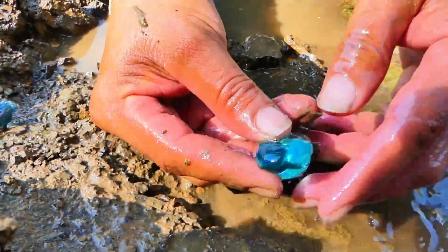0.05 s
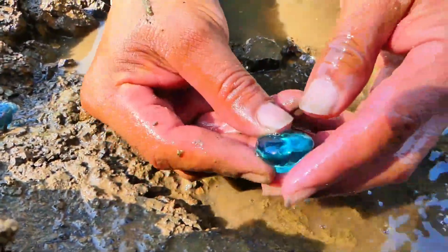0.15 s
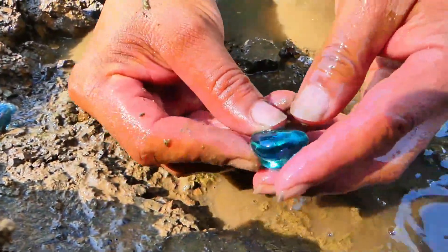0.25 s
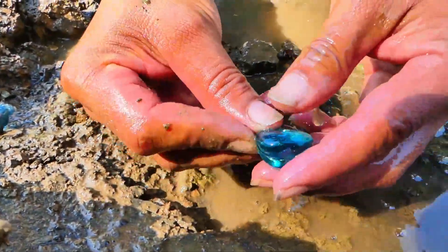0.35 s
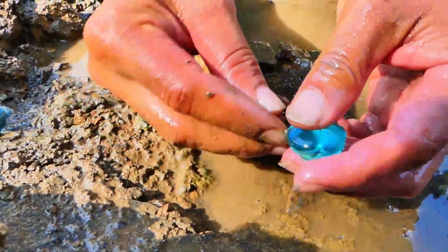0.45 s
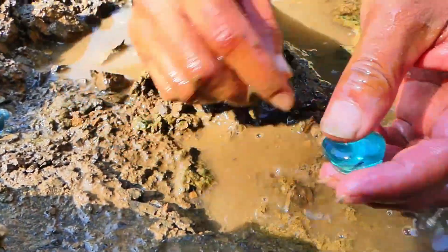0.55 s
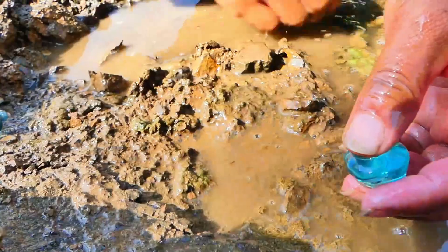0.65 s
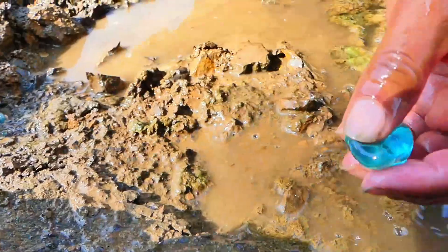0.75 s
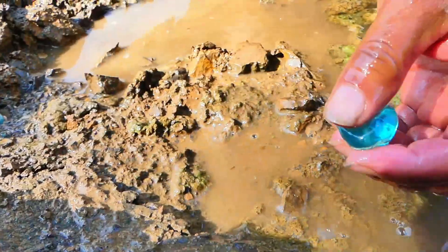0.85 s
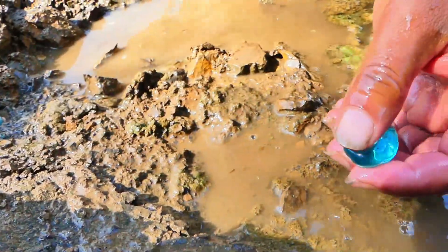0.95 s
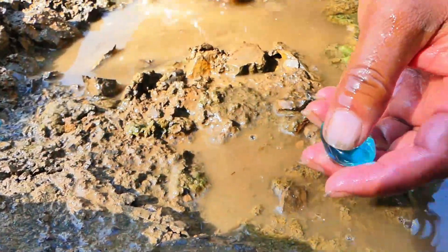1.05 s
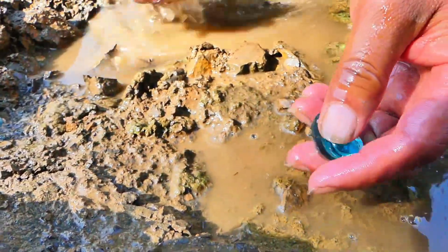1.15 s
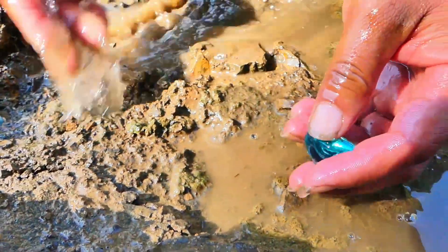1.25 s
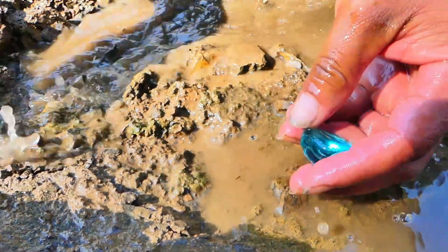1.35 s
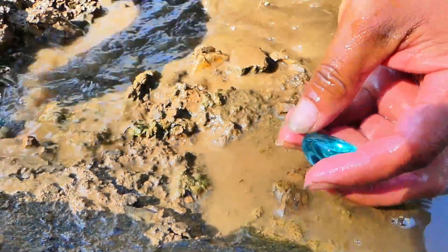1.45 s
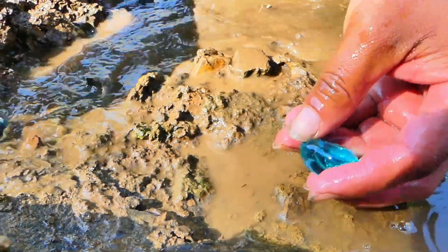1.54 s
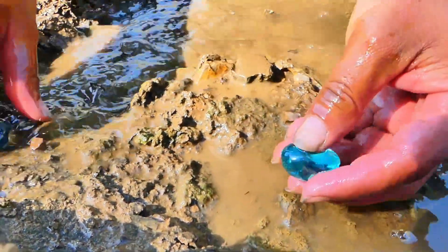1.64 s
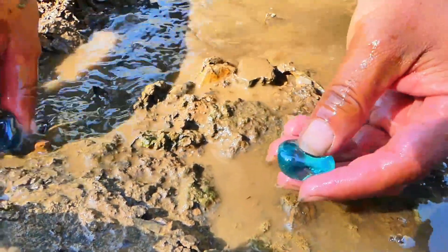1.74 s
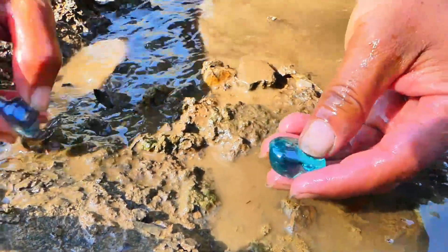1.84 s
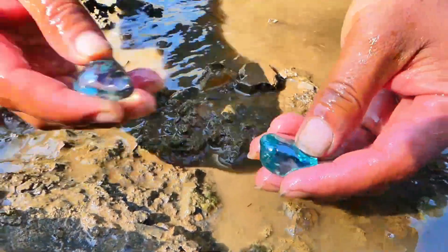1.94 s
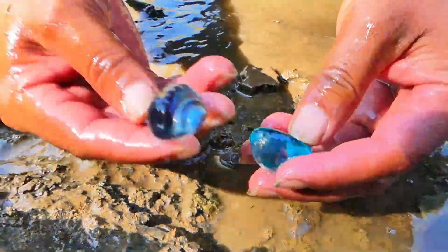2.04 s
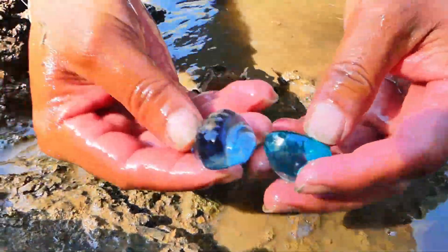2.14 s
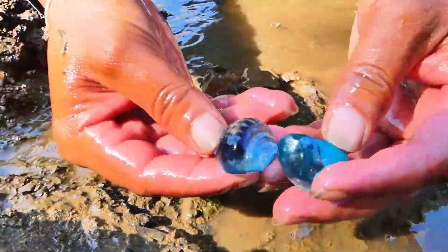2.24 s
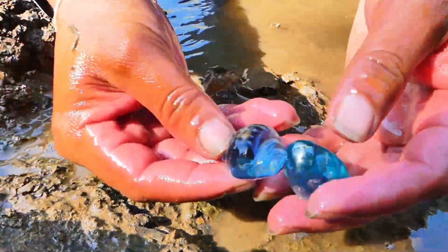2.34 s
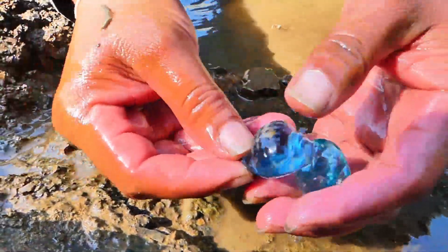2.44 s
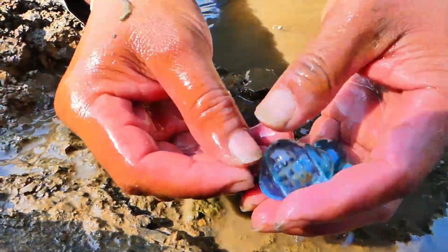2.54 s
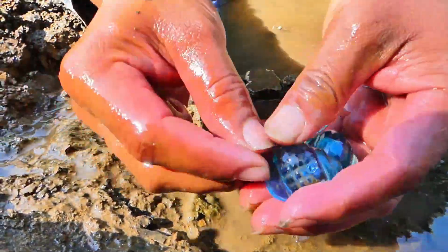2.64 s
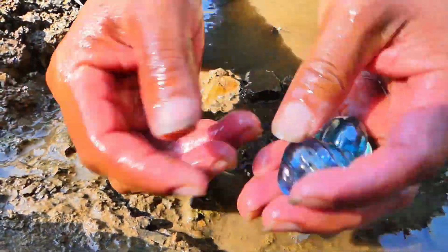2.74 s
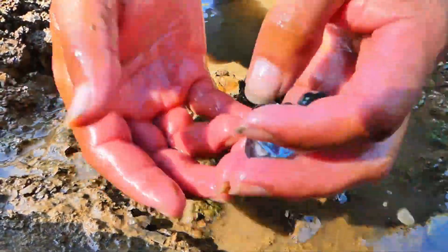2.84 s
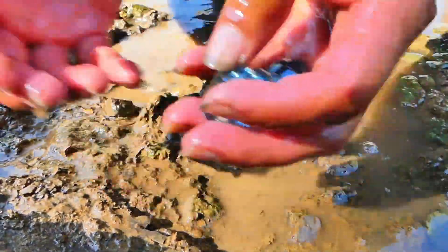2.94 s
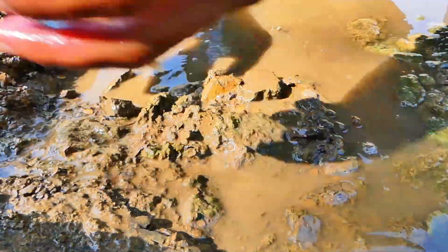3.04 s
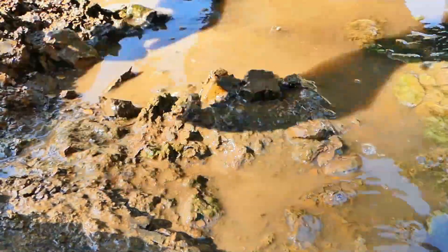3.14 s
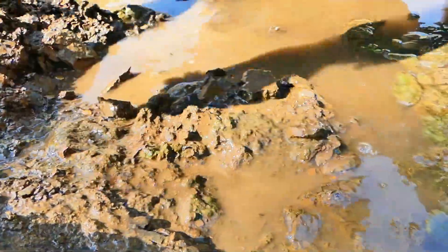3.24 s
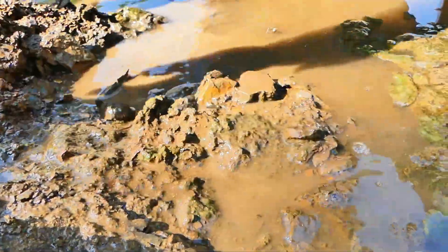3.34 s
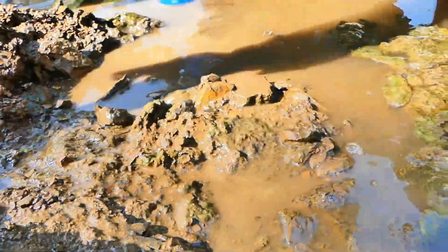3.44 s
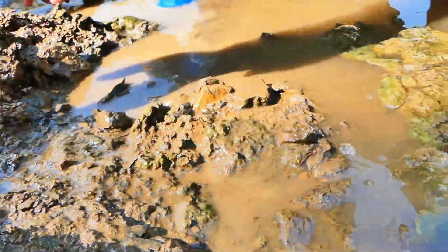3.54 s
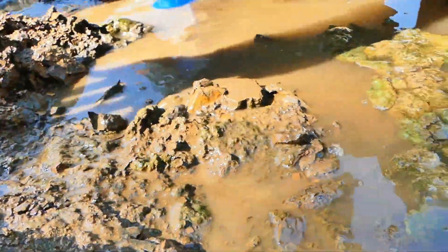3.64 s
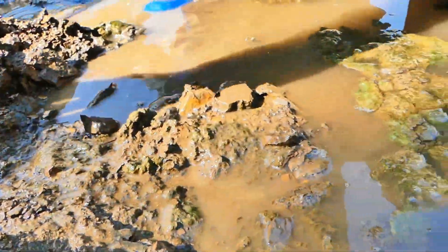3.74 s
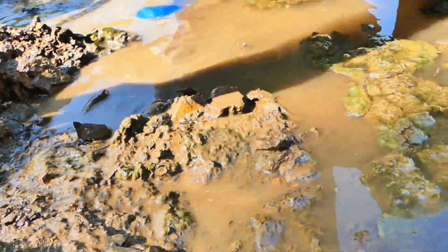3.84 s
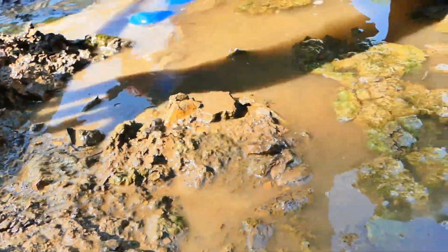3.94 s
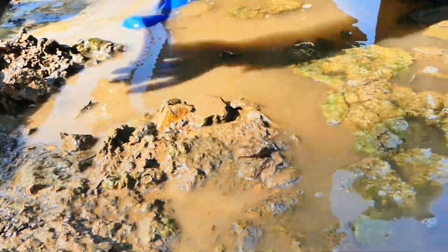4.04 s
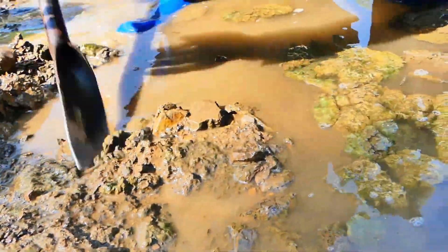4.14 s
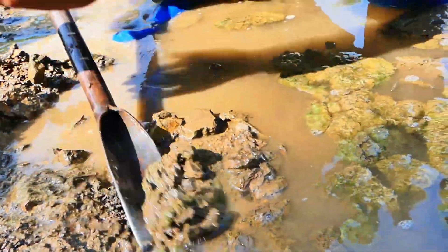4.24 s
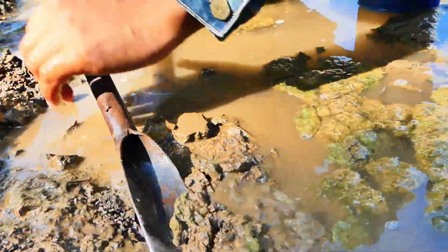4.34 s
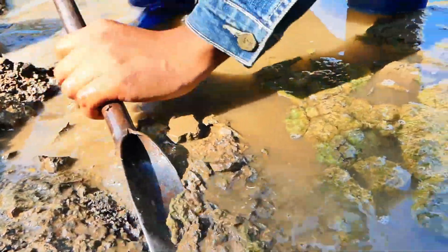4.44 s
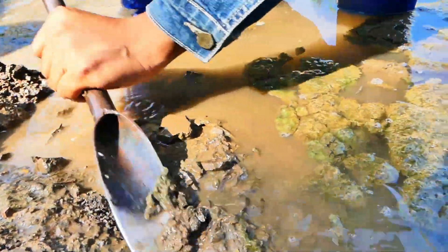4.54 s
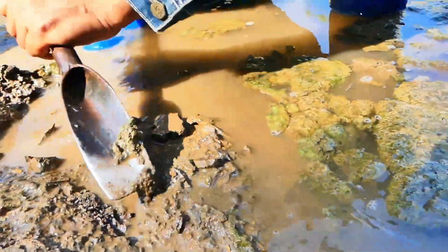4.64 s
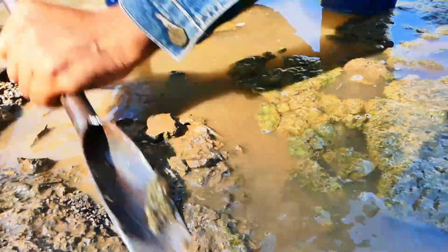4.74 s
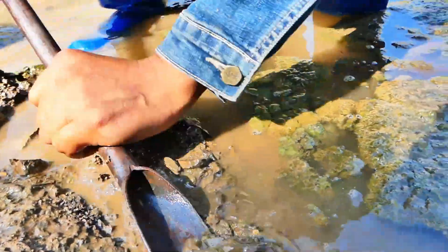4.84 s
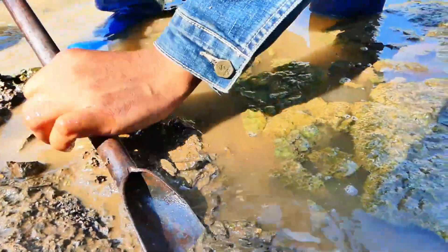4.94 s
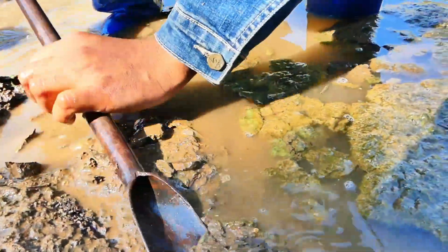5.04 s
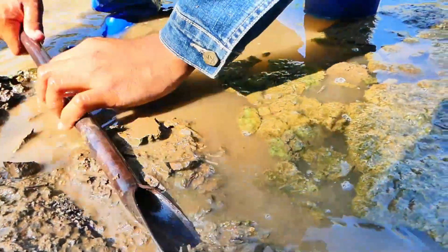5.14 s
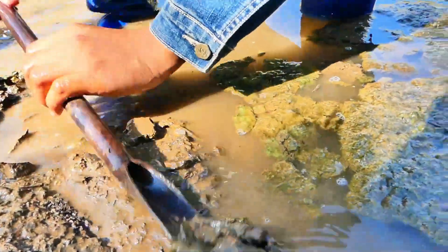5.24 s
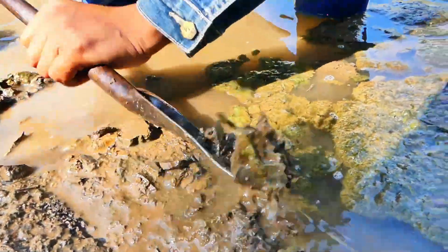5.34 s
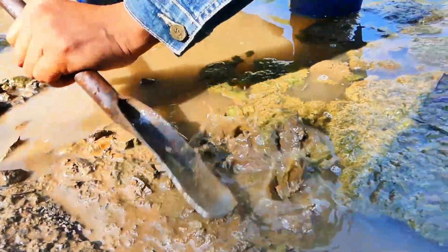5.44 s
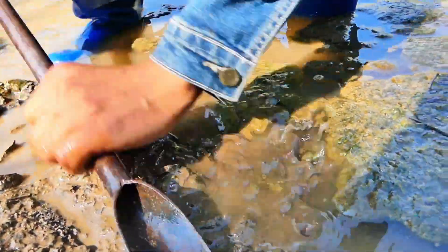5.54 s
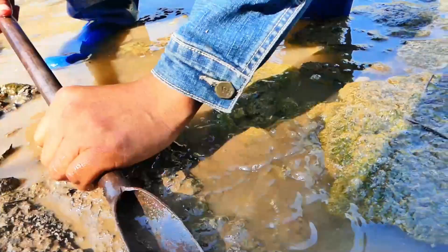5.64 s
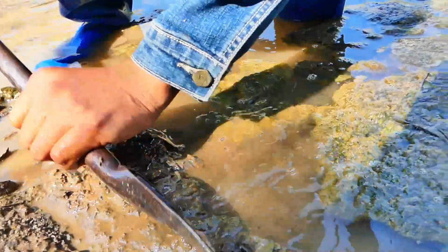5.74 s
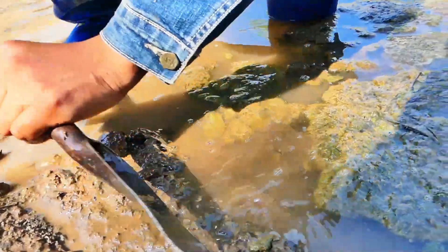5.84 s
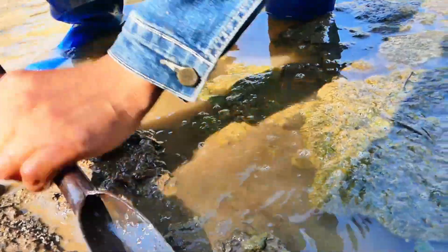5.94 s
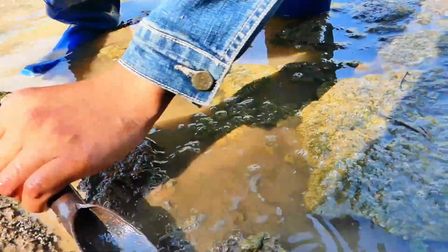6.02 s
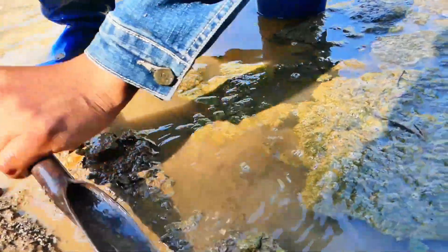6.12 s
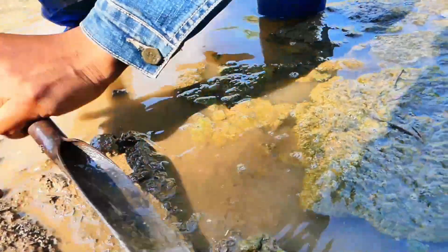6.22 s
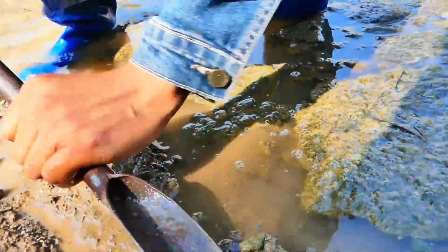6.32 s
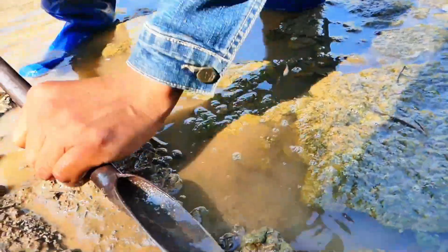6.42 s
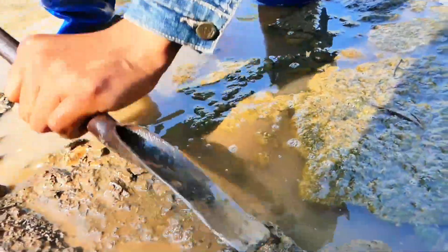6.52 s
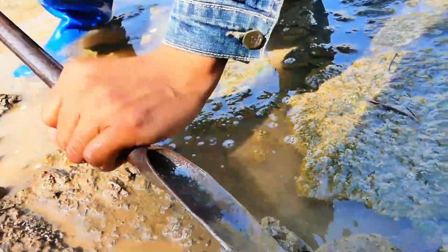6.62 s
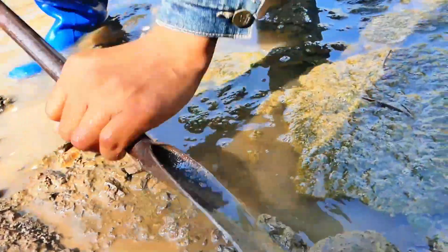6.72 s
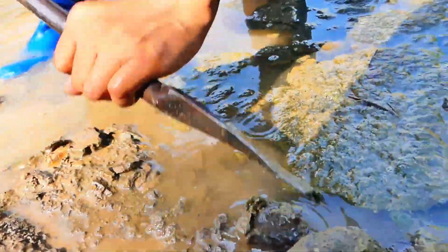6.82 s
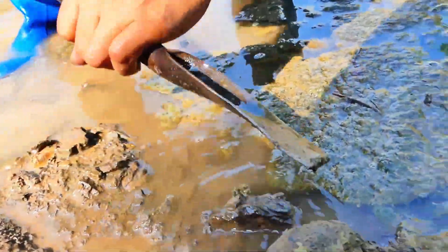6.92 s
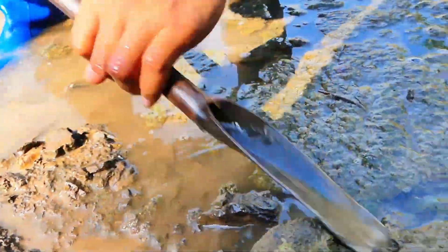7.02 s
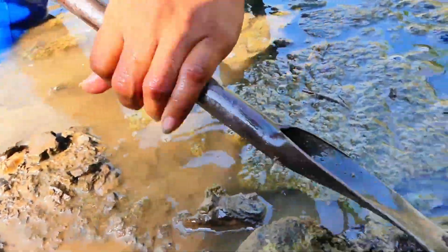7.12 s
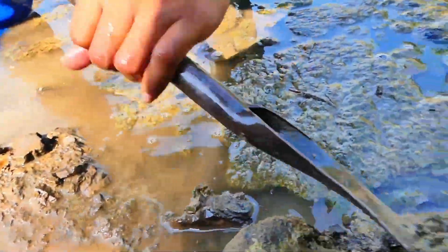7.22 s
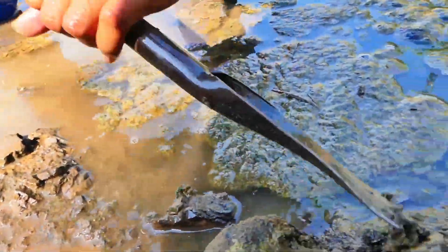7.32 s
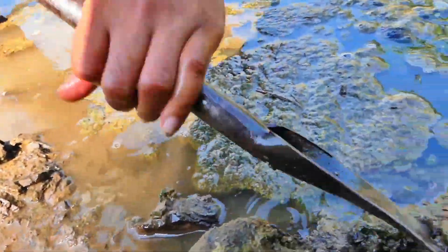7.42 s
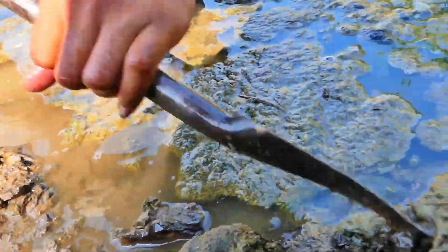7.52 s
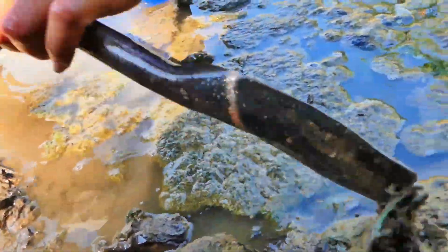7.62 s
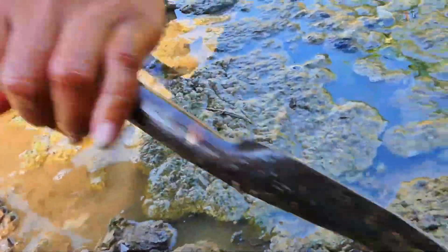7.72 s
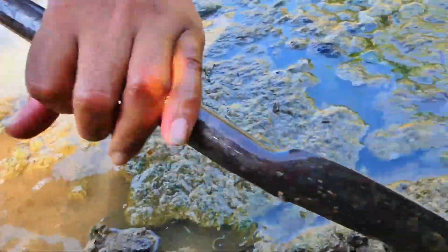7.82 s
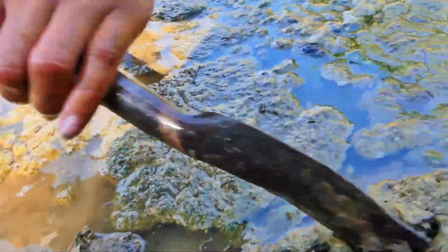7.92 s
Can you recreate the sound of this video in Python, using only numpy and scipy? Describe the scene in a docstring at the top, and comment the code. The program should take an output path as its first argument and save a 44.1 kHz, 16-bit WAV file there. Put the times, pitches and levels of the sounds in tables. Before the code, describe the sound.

A close stereo microphone beside a muddy puddle picks up faint handling, a lively rinse of splashes, gurgles and wet clicks, then near quiet. Metal then bites into wet grit: irregular scrapes, dull mud thuds, clanks on stone and popping mud bubbles. A sleeve rustles late on. The digging sits slightly left, with a light outdoor breeze and little reverberation.

```python
"""In quiet open air, close to a shallow puddle, wet fingers rub glass pebbles: skin sticks and slips,
bubbles ring, spray washes and small wet contacts click through damped resonances.
Then a steel scoop digs in gritty mud: fracturing grit and blows on stones drive its modes and shake the
mud, while sloshing water and collapsing mud pockets ring as air bubbles. A cloth sleeve swishes."""
import sys
import numpy as np
from scipy import signal
from scipy.fft import rfft, irfft, next_fast_len
from scipy.io import wavfile
from scipy.ndimage import map_coordinates

SR = 44100
rng = np.random.default_rng(int(sys.argv[2]) if len(sys.argv) > 2 else 0)


def dump(signal):
    """Clip the signal to [-1, 1] and save it as 16-bit WAV at the path in sys.argv[1]."""
    limited = np.clip(np.atleast_2d(signal).T, -1, 1)
    pcm = np.round(limited * 32767).astype(np.int16)
    wavfile.write(sys.argv[1], SR, pcm)


N = 351477
TIME = np.arange(N) / SR  # seconds
AGE = np.arange(SR // 4) / SR  # seconds inside one event

# spectrum of the outdoor hush: frequency_hz, relative_db_per_hz
HUSH_SPECTRUM = [(15, -51), (25, -17.5), (96, -1.5), (129, -3.5), (297, -4), (331, -7.5), (378, -10.5),
                 (433, -7.5), (537, -13), (1050, -11.5), (1530, -19.5), (5430, -20.5), (15500, -25.5)]
HUSH_DB = -63
# breeze and distant surroundings: time_s, level_db
BREEZE = [(0, -72.5), (3.1, -75), (3.6, -61), (4.5, -63), (5.0, -66), (5.9, -68), (6.4, -57.5), (6.75, -56),
          (7.3, -59.5), (7.97, -63)]
# stereo lean of the work before drift: frequency_hz, left_minus_right_db
LEFT_LEAN = [(60, -16), (300, 5.5), (700, 6.5), (1500, 4.5), (4500, 1.5), (10000, -1)]
# the lean grows, then shrinks towards the centre: time_s, share_of_lean
DRIFT = [(1, 0.74), (3.8, 1.34), (7.97, .25)]
TOP_HZ = 15900  # band limit

# cloth swishes: centre_s, half_length_s, level_db, centre_hz
SWISHES = [(3.353, 0.077, -59, 1800), (6.185, 0.043, -56, 1040), (6.5, 0.1, -61, 1110),
           (6.996, 0.058, -49.5, 1120)]

# soft bumps of the hands: start_s, level_db
BUMPS = [(0.372, -36.5), (0.544, -34.5), (1.989, -37.5), (2.064, -40), (2.107, -44), (3.402, -39.5)]
BUMP_HZ, BUMP_T60_S = 109, 0.049
JUDDER_S, JUDDER_WIDTH_S, JUDDER_DB = 2.568, 0.019, -40  # middle, Gaussian width, drive level
JUDDER_HZ, JUDDER_OCTAVES_PER_S = 134, -11.5  # pitch at the middle, glide
SQUEAK_S, SQUEAK_LENGTH_S, SQUEAK_DB = 2.622, 0.024, -33  # start, length, peak of each slip
SLIPS_PER_S, SLIP_DOUBLING_S = 125, 0.014  # initial rate, time in which it doubles

# wet clicks of drops, pebbles and small stones: start_s, peak_db, centre_hz
CLICKS = [(0.288, -40, 10300), (.358, -40, 3550), (1.01, -22, 3220), (1.18, -25.5, 3470),
          (1.263, -27.5, 4000), (1.296, -26, 4750), (1.304, -28, 3970), (1.334, -20, 5370),
          (1.37, -26, 4200), (1.397, -32, 2220), (2.152, -34, 1750), (2.286, -35.5, 1830),
          (2.295, -29.5, 1850), (2.585, -37.5, 2170), (2.607, -27.5, 5740), (3.499, -29.5, 2400),
          (3.539, -34, 2560), (3.55, -17, 5860), (4.028, -39, 4360), (4.294, -16, 2000), (4.426, -37, 4960),
          (4.953, -42.5, 1750), (5.242, -32.5, 1550), (5.282, -37, 2360), (5.48, -27.5, 3320),
          (6.416, -33.5, 5200)]
CLICK_T60_S = 0.018  # of the exciting burst

# hand or scoop sloshes the water: start_s, hold_s, level_db
SLOSHES = [(0.685, .025, -57), (.923, .05, -52), (0.981, .085, -38), (1.201, .015, -44),
           (1.273, .035, -41.5), (1.352, .075, -40.5), (4.342, .04, -47.5), (5.32, .07, -54),
           (5.488, .03, -44)]
SLOSH_RISE_S, SLOSH_T60_S = .012, .19
# stirring of the water between the sloshes: time_s, level_db
TRICKLE = [(0, -82), (.66, -92), (.87, -58), (1.17, -52), (1.52, -56.5), (1.75, -57.5), (1.97, -73),
           (2.7, -74), (2.95, -62), (3.7, -68), (4.65, -56.5), (5.05, -64), (5.3, -59), (6.1, -59),
           (6.35, -67), (7.97, -64)]
CALM_DB = -57  # below this stirring level the water only fizzes evenly
# spectrum of the spray: frequency_hz, relative_db_per_hz
SPRAY_SPECTRUM = [(180, -18.5), (300, -17.5), (652, -16), (985, -28), (1110, -27), (1970, -9.5),
                  (2250, -15.5), (2650, -13), (5850, -15.5), (15500, -25.5)]
SPURT_DB, SPURTS_PER_S = 3, 55  # largest spread and rate of the uneven spurts
# large air bubbles in the water: start_s, level_db, initial_pitch_hz
BUBBLES = [(.938, -35, 3560), (.958, -29, 4800), (.966, -26, 3140), (0.984, -32.5, 795),
           (.989, -20.5, 4740), (1.04, -31, 853), (1.053, -28.5, 1106), (1.104, -31.5, 1630),
           (1.125, -34.5, 2220), (1.179, -22.5, 4740), (1.179, -28.5, 2020), (1.216, -33.5, 1270),
           (1.262, -19.5, 1237), (1.281, -30.5, 1790), (1.297, -23.5, 2490), (1.397, -22, 2210),
           (1.485, -33, 3320), (2.242, -51, 1320), (3.734, -42, 1640), (4.19, -38, 4240), (4.338, -29, 944),
           (4.365, -30, 1335), (4.614, -31, 1536), (5.446, -33, 4470), (5.479, -27, 1530),
           (5.551, -38, 1360), (5.571, -30, 1038)]
BUBBLE_CYCLES, BUBBLE_OCTAVES_PER_S = 61.6, 7.7  # life to -60 dB in initial cycles; mean climb
# collapsing pockets of soft mud: start_s, level_db, initial_pitch_hz
PLOPS = [(3.54, -18.5, 456), (4.352, -12.5, 470), (4.864, -2.5, 900), (4.877, -2.5, 1010),
         (6.524, -28.5, 595), (6.544, -27, 567), (7.6, -19, 1330)]
PLOP_CYCLES, PLOP_RISE_OCTAVES = 5.2, 0.28  # life to -60 dB in initial cycles; climb over it

# strokes through grit: start_s, length_s, level_db, mud_thud_relative_db, depth_0_to_1
SCRAPES = [(3.762, .025, -50, -20, 0.26), (3.786, 0.026, -44, -25, 0.54), (4.221, 0.066, -33, -6, .5),
           (4.28, 0.026, -32, -10, 0.42), (4.305, 0.067, -39, -7.5, 0.89), (4.481, 0.13, -56.5, -20, 0.6),
           (4.573, 0.058, -44, -12.5, 0.5), (4.812, 0.024, -36.5, -20, 0.33),
           (4.824, 0.046, -26.5, -10, 0.59), (5.025, 0.025, -52, -14, 0.82), (5.119, 0.077, -46, -19, 0.74),
           (5.591, 0.014, -29.5, -7.5, 0.47), (5.761, 0.056, -48.5, -11.5, 0.46),
           (6.004, 0.0068, -37.5, -21, 0.14), (6.031, 0.014, -46.5, -5, 0.57),
           (6.657, 0.0061, -24, -15, .6), (6.818, 0.031, -40.5, -17.5, 0.24),
           (7.102, 0.065, -33, -10.5, 0.45), (7.237, 0.044, -48.5, -11.5, 0.24),
           (7.433, 0.056, -35, -11.5, 0.48), (7.766, .075, -40, -9, 0.53), (7.843, 0.012, -35, -5.5, 0.76),
           (7.894, 0.026, -47, 0.5, 0.73), (7.918, 0.066, -49, -26, 0.36)]
# blows on stones: start_s, level_db, mud_thud_relative_db, depth_0_to_1
BLOWS = [(3.808, -25.5, -13, 0.09), (3.907, -31.5, -21, 0.45), (4.216, -24.5, -14, 0.29),
         (4.849, -29, -32, 1), (5.148, -34.5, -14, 0.94), (5.181, -32.5, -10, 1), (5.588, -20, -30, 0.6),
         (6.011, -21, -8, 0.85), (6.018, -33.5, 2.5, 0.68), (6.372, -23, -8, 0.94), (6.669, -44.5, 7.5, .9),
         (6.822, -41, -22, 0.2), (7.093, -33.5, -1.5, 0.6), (7.129, -23, -18, 0.36), (7.15, -30.5, -6, 0.6),
         (7.761, -24.5, -4, 0.64), (7.834, -29, -2.5, 1)]
# modes of the steel scoop before loading: pitch_hz, mean_relative_db, unloaded_t60_s
BLADE_MODES = [(657, -15, 0.18), (915, -13, 0.18), (1141, -17, 0.22), (1427, -3, 0.084), (1895, -12, 0.13),
               (2067, -3, 0.12), (2369, -14, 0.15), (2869, -10, 0.084), (3160, -12, 0.14),
               (3273, -13, 0.12), (3946, 0, 0.072), (4221, -12, 0.15), (4344, -20, 0.12),
               (4700, -14, 0.099), (4920, -14, 0.089), (5211, -15, 0.11), (5857, -15, 0.14),
               (5970, -14, 0.078), (6358, -14, 0.074), (6794, -22, 0.13), (6934, -25, 0.12),
               (7284, -28, 0.12), (7903, -35, 0.12), (8732, -25, 0.094), (9275, -24, 0.071),
               (9975, -30, 0.14), (10400, -14, 0.053), (11560, -9, 0.05)]
# spectrum of the grit before tilting: frequency_hz, relative_db_per_hz
GRIT_SPECTRUM = [(200, -24), (500, -9), (1000, -7.5), (1800, -0.5), (3000, -1), (4500, -5), (6500, -8.5),
                 (7800, -14), (10000, -14.5), (15000, -27)]
# spectrum of the shaken mud: frequency_hz, relative_db_per_hz
MUD_SPECTRUM = [(30, -39), (60, -50), (120, -2), (220, 7), (340, 2.5), (550, 0), (900, -15), (2000, -26)]
# pairs run from the surface to the buried blade
RING_DB = (7, -18)  # steel against grit
HOLLOW_DB = (-29.5, -3)  # the pocket resonates more as the blade sinks
PEBBLE_DB = (-11, 1.5)  # small stones and mud pockets over the sand
SCRAPE_SLOPE, BLOW_SLOPE = (1.76, -0.65), (0.48, -1.06)  # exponents of the power spectrum
BLOW_T60_S = (0.088, 0.011)
HOLLOW_HZ = 1740  # pocket between the curved blade and the ground
STROKE_RISE, STROKE_T60_S = 0.07, 0.051  # attack as a share of the length; release
SINK_SLOPE = 0.27  # a stroke starts this much brighter and ends this much duller
BLADE_DETUNE, BLADE_BEAT_HZ = 0.017, 24  # scales of the random mud load shift and mode split


def amp(db):
    """Decibels express the logarithm of an amplitude ratio."""
    return 10 ** (np.asarray(db) / 20)


def unit(x):
    """Normalisation: divide by the root mean square."""
    return x / np.sqrt(np.mean(x ** 2) + 1e-20)


def fade(t, t60):
    """Exponential decay: 60 dB are lost in each t60."""
    return np.exp(-np.log(1000) * t / max(t60, 1e-4))


def along(points, hz):
    """Logarithmic interpolation through (Hz, value) points."""
    f, v = np.transpose(points)
    return np.interp(np.log(hz + 1), np.log(f + 1), v)


def curve(rows):
    """Linear interpolation of (s, value) rows, one value per sample."""
    s, v = np.transpose(rows)
    return np.interp(TIME, s, v)


def at_depth(ends, depth):
    """Linear interpolation from the surface to the buried blade."""
    return ends[0] + (ends[1] - ends[0]) * np.clip(depth, 0, 1)


def wobble(rate, size):
    """Random modulation: a smooth curve through rate random knots a second."""
    knots = rng.standard_normal(int(size * rate / SR) + 4)
    return map_coordinates(knots, [np.arange(size) * rate / SR])


def filtered(x, response):
    """Linear filtering: the spectrum times a response of frequency."""
    n = x.shape[-1]
    m = next_fast_len(n + 4096)
    return irfft(rfft(x, m) * response(np.fft.rfftfreq(m, 1 / SR)), m)[..., :n]


def colour(x, spectrum, slope=0):
    """Spectral shaping: power tilted by Hz ** slope above 700 Hz, at rms 1."""
    def response(hz):
        return amp(along(spectrum, hz)) * np.maximum(hz, 700) ** (slope / 2)
    return unit(filtered(x, response))


def resonance(x, centre_hz, q):
    """Damped resonance: a single band-pass mode."""
    def response(f):
        damping = 1j * f * centre_hz / q
        return damping / (centre_hz ** 2 - f ** 2 + damping)
    return filtered(x, response)


def add(track, s, sound):
    """Superposition: mix a sound into the track at time s."""
    part = track[max(round(s * SR), 0):][:len(sound)]
    part += sound[:len(part)]


def crackle(size, rate, spread_db, smooth):
    """Fracture noise: random impulses of unequal strength over a smooth rush."""
    strength = amp(spread_db * np.minimum(rng.exponential(size=size), 3))
    sparks = (rng.random(size) < rate / SR) * strength
    return unit(unit(sparks * rng.choice([-1, 1], size)) + smooth * rng.standard_normal(size))


def bubble(t, hz, t60, rise):
    """Bubble resonance: an air pocket rings and decays, its pitch climbing by rise octaves over t60."""
    phase = 2 * np.pi * hz * t * (1 + (2 ** rise - 1) * t / t60 / 2)
    return np.sin(phase) * amp(-60 * t / t60) * (1 - np.exp(-1.5 * hz * t))


def air():
    """Broadband noise: an almost steady hush, a faint narrow-band whirr and a swelling breeze."""
    # a shared part plus a stronger independent part in each channel makes it wide
    hush = colour(rng.standard_normal(N) + 8.8 * rng.standard_normal((2, N)), HUSH_SPECTRUM)
    whirr = amp(-79) * unit(resonance(rng.standard_normal(N), 836, q=42))
    breeze_spectrum = [(40, -51), (200, 2.5), (600, 0.0), (1500, -4.0), (3000, -11.0), (9000, -22.0)]
    breeze = colour(rng.standard_normal(N) + 5.8 * rng.standard_normal((2, N)), breeze_spectrum)
    hush_level = amp(HUSH_DB + 0.99 * wobble(4.25, N))
    breeze_level = amp(curve(BREEZE) + 0.7 * wobble(6.6, N))
    return hush_level * hush + whirr + breeze_level * breeze


def ground(x):
    """Diffuse scattering: rock, hands and water return a brief decaying tail."""
    decay = fade(AGE, .04) + amp(-30) * fade(AGE, .16)
    tail = rng.standard_normal(len(AGE)) * (1 - fade(AGE, .004)) * decay
    return signal.fftconvolve(x, tail / np.linalg.norm(tail))[:N]


def sleeve():
    """Sliding friction: cloth over cloth makes band-limited noise in soft swells."""
    out = np.zeros(N)
    for s, width, db, hz in SWISHES:
        cloth = [(hz / 5, -20), (hz / 2, -3), (hz, 0), (hz * 1.45, -3), (hz * 2.3, -17), (hz * 8, -35)]
        rub = colour(rng.standard_normal(N), cloth)
        out += amp(db) * np.exp(-((TIME - s) / width) ** 2 / 2) * rub
    return out


def judder():
    """Stick-slip friction: a falling harmonic drag excites the resonance of the cupped hands."""
    out = np.zeros(N)
    t = AGE - AGE.mean()  # time from the middle
    phase = 2 * np.pi * np.cumsum(JUDDER_HZ * 2 ** (JUDDER_OCTAVES_PER_S * t)) / SR
    drag = np.sin(phase) + 0.66 * np.sin(2 * phase) + 0.11 * np.sin(3 * phase)
    drag *= amp(JUDDER_DB) * np.exp(-(t / JUDDER_WIDTH_S) ** 2 / 2)
    add(out, JUDDER_S + t[0], .5 * drag + resonance(drag, 220, q=3.2))
    return out


def squeak():
    """Stick-slip friction: ever faster slips on wet glass each excite a treble resonance."""
    out = np.zeros(N)
    rate = SLIPS_PER_S * 2 ** (AGE[AGE < SQUEAK_LENGTH_S] / SLIP_DOUBLING_S)
    slip_count = np.ceil(np.cumsum(rate) / SR)
    for i in np.flatnonzero(np.diff(slip_count, prepend=0)):
        slip = resonance(fade(AGE, 0.036) * rng.standard_normal(len(AGE)), 5330, q=5.8)
        add(out, SQUEAK_S + i / SR, amp(SQUEAK_DB) * slip / np.abs(slip).max())
    return out


def fingers():
    """Friction and soft impact: skin judders and squeaks, and the hands bump at a low pitch."""
    out = judder() + squeak()
    for s, db in BUMPS:
        add(out, s, amp(db) * bubble(AGE, BUMP_HZ, BUMP_T60_S, 0))
    return out


def clicks():
    """Impact excitation: a small wet contact snaps broadband, strongest near one resonance."""
    out = np.zeros(N)
    for s, db, hz in CLICKS:
        burst = fade(AGE, CLICK_T60_S) * rng.standard_normal(len(AGE))
        snap = resonance(burst, hz, q=5.5) + .2 * resonance(burst, hz / 2, q=1.5)
        snap = filtered(snap, lambda f: 1 / (1 + .5j * f / hz))  # the water film softens the edge
        add(out, s, amp(db) * snap / np.abs(snap).max())
    return out


def stirring():
    """Addition of powers: sloshes rise, hold and die away over the trickle; returns a level in dB."""
    power = amp(curve(TRICKLE)) ** 2
    for start, hold, db in SLOSHES:
        age = np.maximum(TIME - start, 0)
        rise = 1 - np.exp(-age / SLOSH_RISE_S)
        release = fade(np.maximum(age - hold, 0), SLOSH_T60_S)
        power = power + (amp(db) * rise * release) ** 2
    return 10 * np.log10(power)


def swarm(level_db, count, low_hz, cycles, gain_db):
    """Bubble statistics: harder stirring makes random bubbles more frequent and louder."""
    births = np.cumsum(amp(.75 * level_db) * (level_db > CALM_DB))
    out = np.zeros(N)
    for when, a, b, life, size, rise in rng.random((count, 6)):
        hz = min(low_hz * 2.7 ** (a + b), 14000)
        t60 = cycles * (.5 + life) / hz
        i = np.searchsorted(births, when * births[-1])
        level = amp(level_db[i] + gain_db - 18 * size)
        add(out, i / SR, level * bubble(AGE[:int(t60 * SR)], hz, t60, .5 * rise))
    return out


def spray(level_db):
    """Turbulent noise: a wash follows the stirring, breaking into uneven spurts when thrown."""
    thrown = np.clip((level_db - CALM_DB) / 10, 0, 1)
    level = amp(level_db - 4.5 + thrown * SPURT_DB * wobble(SPURTS_PER_S, N))
    return level * colour(crackle(N, rate=700, spread_db=-1.5, smooth=0.9), SPRAY_SPECTRUM)


def water():
    """Bubble resonance: swarms ring over the spray, with large bubbles and mud plops on top."""
    level_db = stirring()
    gurgle = swarm(level_db, count=460, low_hz=680.4, cycles=42.3, gain_db=7.0)
    droplets = swarm(level_db, count=520, low_hz=2060, cycles=29, gain_db=9)
    out = gurgle + droplets + spray(level_db)
    for s, db, hz in BUBBLES:
        t60 = BUBBLE_CYCLES / hz
        add(out, s, amp(db) * bubble(AGE, hz, t60, BUBBLE_OCTAVES_PER_S * t60))
    for s, db, hz in PLOPS:
        add(out, s, amp(db) * bubble(AGE, hz, PLOP_CYCLES / hz, PLOP_RISE_OCTAVES))
    return out


def stones(rate):
    """Free vibration: small stones and bursting mud pockets ring, each at its own pitch."""
    out = np.zeros(len(AGE))
    for when, pitch, size in rng.random((int(rate * len(AGE) / SR), 3)):
        hz = 700 * 10 ** pitch
        t60 = 36 / hz
        add(out, when * len(AGE) / SR, amp(-20 * size) * bubble(AGE[:int(t60 * SR)], hz, t60, 0))
    return out


def blade_ring(force, ring_db):
    """Modal vibration: a force drives beating mode pairs, which mud damps and shifts off pitch."""
    free = np.clip(amp(ring_db - 2), .12, .85)  # freedom from the mud
    ring = np.zeros(len(AGE))
    variations = rng.standard_normal((len(BLADE_MODES), 4))
    for (hz, db, t60), (strength, load, phase, split) in zip(BLADE_MODES, variations):
        pitch = hz * (1 + BLADE_DETUNE * (1.05 - free) * load)
        mode = np.sin(2 * np.pi * (pitch * AGE + phase))
        twin = .5 * np.sin(2 * np.pi * (pitch + BLADE_BEAT_HZ * split) * AGE)
        ring += amp(db + 3 * strength) * fade(AGE, t60 * free) * (mode + twin)
    ring = filtered(ring, lambda f: amp(along([(600, 5.0), (2000, -3.5), (7000, 2.0)], f)))
    return unit(signal.fftconvolve(force, ring)[:len(AGE)]) * np.sqrt(np.mean(force ** 2))


def contact(grit, depth):
    """Parallel transmission: grit sounds directly, through the pocket and through the steel."""
    ring_db = at_depth(RING_DB, depth)
    rms = np.sqrt(np.mean(grit ** 2))
    pocket = unit(resonance(grit, HOLLOW_HZ, q=3.7))
    crunch = rms * unit(unit(grit) + amp(at_depth(HOLLOW_DB, depth)) * pocket)
    steel = amp(ring_db) * blade_ring(grit, ring_db)
    return (crunch + steel) / np.hypot(1, amp(ring_db))


def scrapes():
    """Fracture and friction: grit breaks in uneven jerks, shakes the mud and drives the steel."""
    out = np.zeros(N)
    for start, length, db, thud_db, depth in SCRAPES:
        push = 1 - np.exp(-AGE / (STROKE_RISE * length))
        push = push * fade(np.maximum(AGE - length, 0), STROKE_T60_S)
        push = push * amp(1.66 * wobble(151.0, len(AGE)))  # jerks
        push /= np.sqrt(np.sum(push ** 2) / (length * SR))
        sand = crackle(len(AGE), rate=2500, spread_db=1.5, smooth=0.49)
        grains = sand + amp(at_depth(PEBBLE_DB, depth)) * unit(stones(rate=450))
        # crossfade from brighter to duller as the blade sinks
        slope = at_depth(SCRAPE_SLOPE, depth)
        sunk = np.minimum(AGE / length, 1)
        first = colour(grains, GRIT_SPECTRUM, slope + SINK_SLOPE)
        last = colour(grains, GRIT_SPECTRUM, slope - SINK_SLOPE)
        grit = push * ((1 - sunk) * first + sunk * last)
        thud = push * colour(rng.standard_normal(len(AGE)), MUD_SPECTRUM)
        add(out, start, amp(db) * (contact(grit, depth) + amp(thud_db) * thud))
    return out


def blows():
    """Impact: a stone stops the blade with a crunch and a ring, and the mud yields more slowly."""
    out = np.zeros(N)
    for s, db, thud_db, depth in BLOWS:
        push = 1 - np.exp(-AGE / 0.00018)
        push = push * fade(np.maximum(AGE - .003, 0), at_depth(BLOW_T60_S, depth))
        grains = crackle(len(AGE), rate=2600, spread_db=-5, smooth=0.84)
        crunch = push * colour(grains, GRIT_SPECTRUM, at_depth(BLOW_SLOPE, depth))
        give = (1 - np.exp(-AGE / 0.0021)) * fade(AGE, 0.035)
        # the lump of mud bounces on the blade at a slightly random pitch
        clod = np.sin(2 * np.pi * 215 * amp(rng.normal(0, 1)) * AGE)
        mud = unit(clod + 1.1 * colour(rng.standard_normal(len(AGE)), MUD_SPECTRUM))
        thud = give / give.max() * mud
        add(out, s, amp(db) * (contact(crunch, depth) + amp(thud_db) * thud))
    return out


def scene():
    """Superposition: scoop, water and sleeve left of centre, hands in the middle, scatter and air."""
    # scoop and puddle carry no deep bass
    high_pass = signal.butter(3, 105, "high", fs=SR, output="sos")
    work = signal.sosfilt(high_pass, scrapes() + blows() + water())
    left_of_centre = work + sleeve()
    near = left_of_centre + clicks() + fingers()
    # opposite signs in the two channels spread the scatter to the sides
    side_db = [(200, -8), (1200, -12), (4000, -11), (9000, -8)]
    side = filtered(ground(near), lambda hz: amp(along(side_db, hz)))
    # only the change from a centred image is scaled by the drift
    lean_change = filtered(left_of_centre, lambda hz: amp(np.outer([.5, -.5], along(LEFT_LEAN, hz))) - 1)
    lean = curve(DRIFT) * lean_change
    return near + lean + np.array([side, -side]) + amp(-15.0) * ground(near) + air()


def record(dry):
    """Transducer response: the microphone has a narrow treble dip and a steep band limit."""
    def response(hz):
        dip = 1 - 0.55 * np.exp(-((hz - 7600) / 160) ** 2)
        return dip / np.sqrt(1 + (hz / TOP_HZ) ** 160)
    return filtered(dry, response)


dry = scene()
out = record(dry)
dump(out)
```